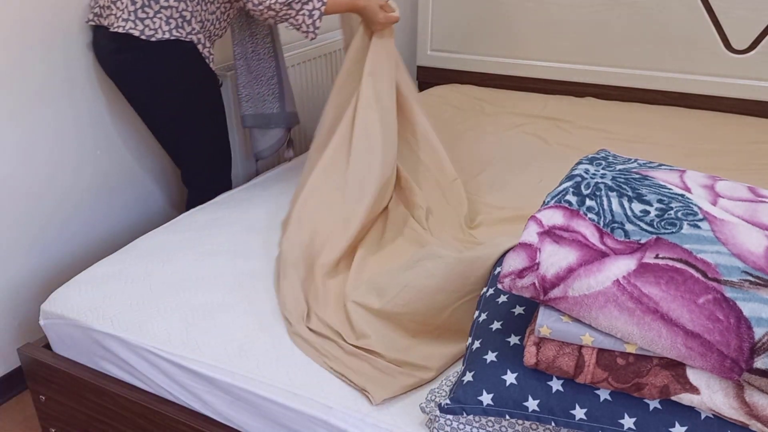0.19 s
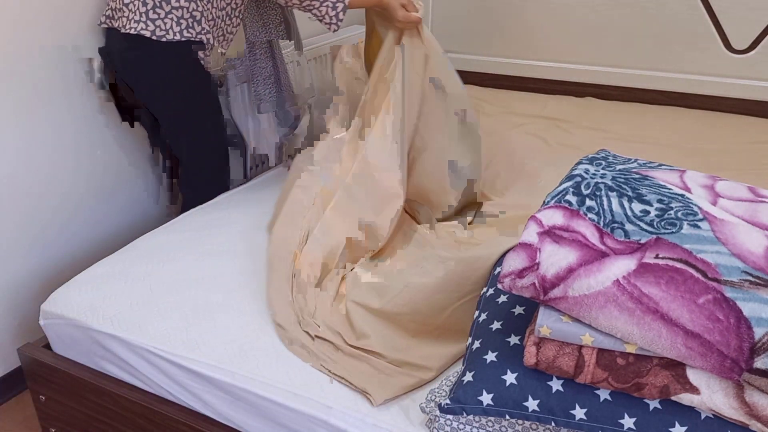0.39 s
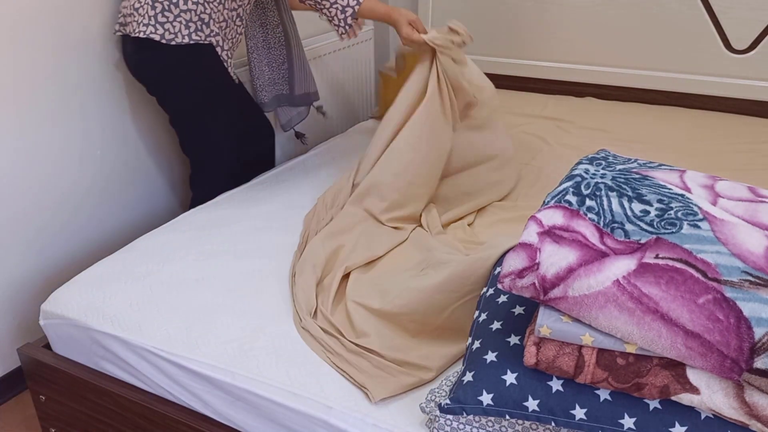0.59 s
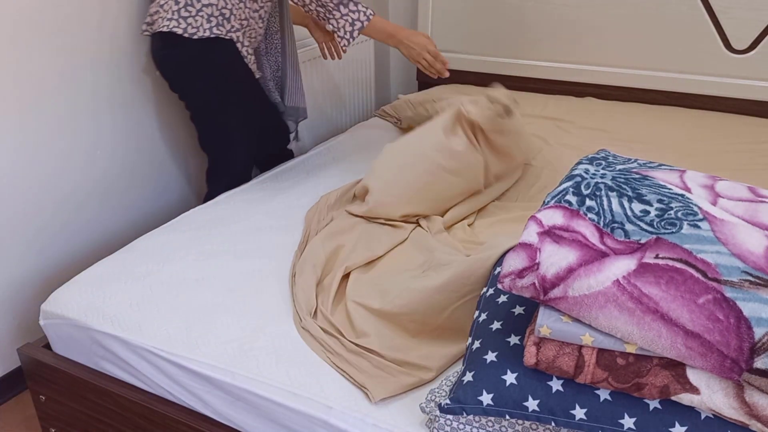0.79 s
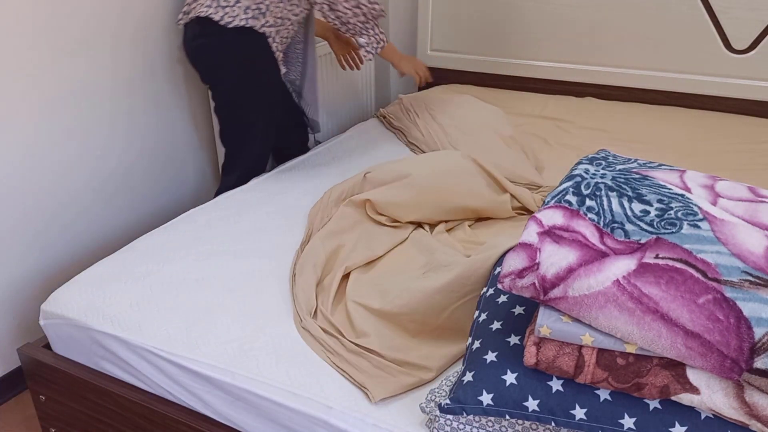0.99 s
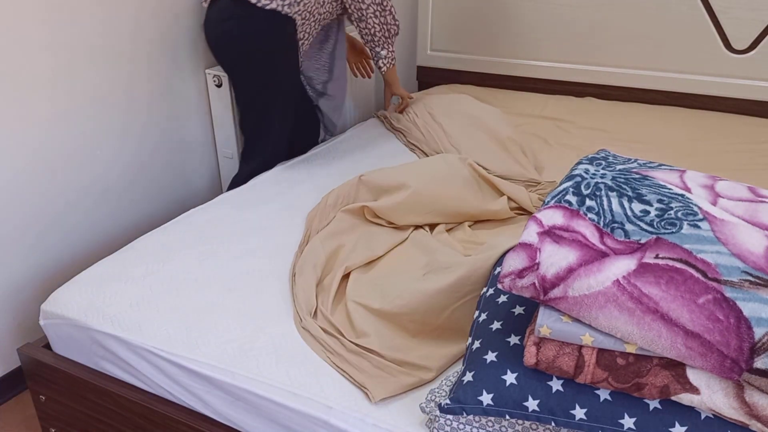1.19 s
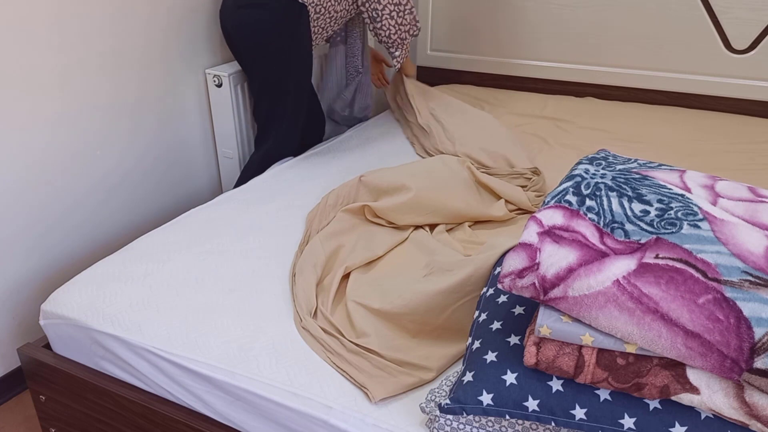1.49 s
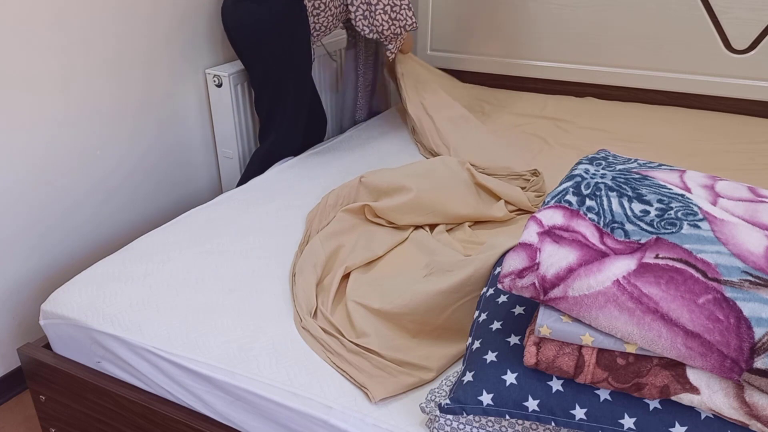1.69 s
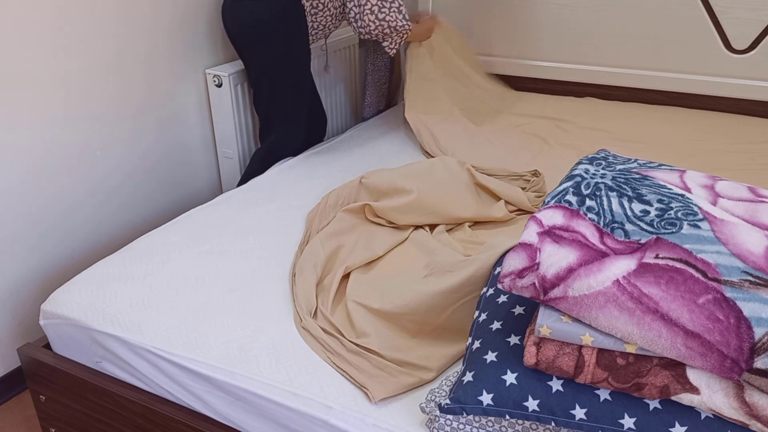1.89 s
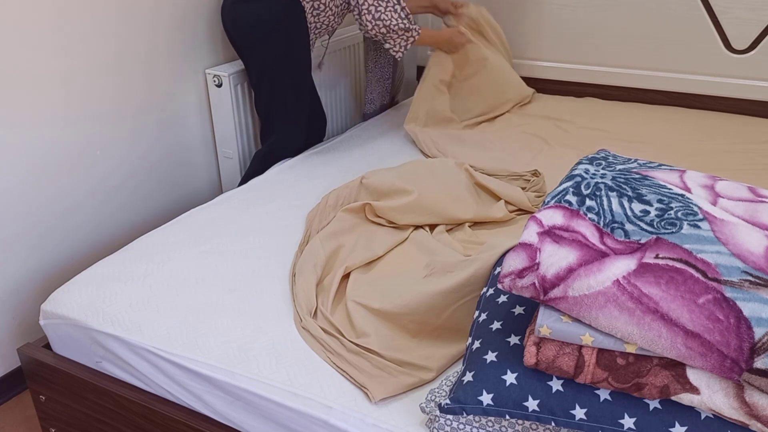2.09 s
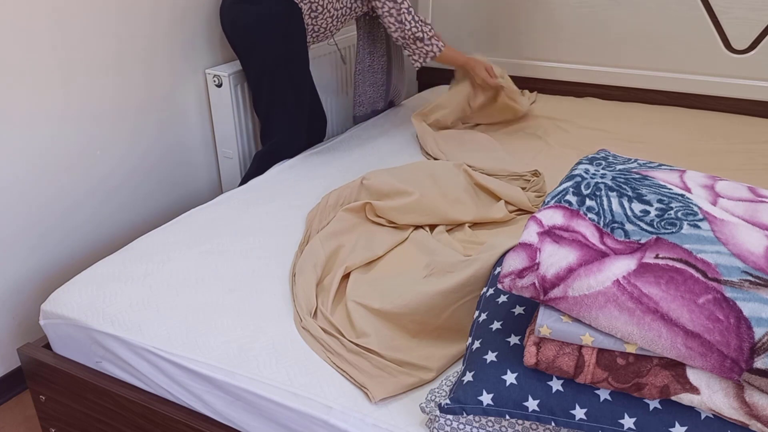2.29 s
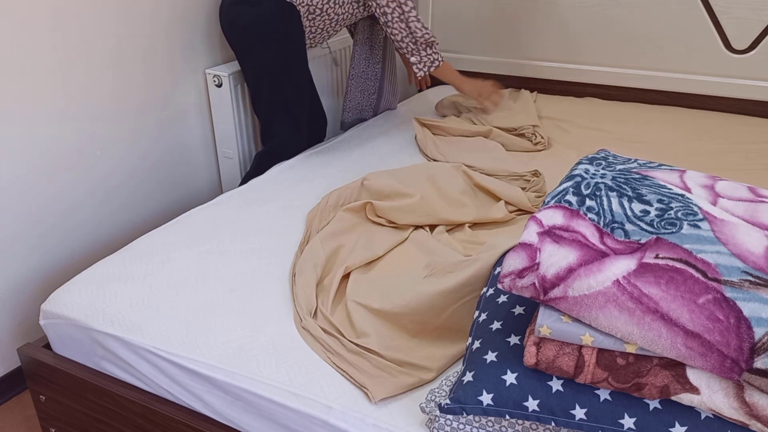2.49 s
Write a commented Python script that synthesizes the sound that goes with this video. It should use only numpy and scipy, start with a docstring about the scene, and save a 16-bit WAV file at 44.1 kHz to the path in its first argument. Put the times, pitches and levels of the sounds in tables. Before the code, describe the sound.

A cotton sheet rustles and swishes over a mattress, with two heavy thumps.

```python
"""A small, quiet bedroom, in stereo, the microphone near enough to the bed to overload.
A cotton sheet is shaken out over the mattress: cloth hisses as it slides on cloth, loose folds
flap, and the bundle slaps down once. Two heavy thumps and a few soft ones set the bed and the
room booming; on the loudest, the bass flattens in the microphone."""
import sys
import numpy as np
from scipy import signal
from scipy.io import wavfile

SR = 44100
rng = np.random.default_rng(int(sys.argv[2]) if len(sys.argv) > 2 else 0)


def store_pcm(level_fs):
    """Save levels as 16-bit WAV."""
    pcm = np.round(np.clip(level_fs, -1, 1) * 32767).astype(np.int16)
    wavfile.write(sys.argv[1], SR, np.atleast_2d(pcm).T)


N = 114660


def amp(db):
    return 10 ** (np.asarray(db) / 20)


def in_time(rows):
    """One curve for each column after time_s."""
    time_s, *columns = np.transpose(rows)
    return [np.interp(np.arange(N) / SR, time_s, column) for column in columns]


def at_hz(rows, hz):
    """Read the second column at a frequency, on a log axis."""
    rows = np.array(rows)
    return np.interp(np.log(hz), np.log(rows[:, 0]), rows[:, 1])


def drift(rate_hz):
    """A slow random wander of RMS 1."""
    hop, settle = 40, 2000
    pole = np.exp(-2 * np.pi * rate_hz * hop / SR)
    noise = rng.standard_normal(N // hop + settle + 2)
    slow = signal.lfilter([1], [1, -2 * pole, pole * pole], noise)[settle:]
    slow /= np.sqrt(np.mean(slow ** 2))
    return np.interp(np.arange(N) / hop, np.arange(len(slow)), slow)


def ring(x, hz, t60_s):
    """A damped mode: a unit click sets a sine of height 1 ringing."""
    decay, step = amp(-60 / (t60_s * SR)), 2 * np.pi * hz / SR
    return signal.lfilter([0, np.sin(step)], [1, -2 * decay * np.cos(step), decay ** 2], x)


def white():
    """Two mid/side pairs of white noise."""
    return rng.standard_normal((2, 2, N))


def banded(spectrum, noise, flicker_db, envelope=lambda hz: 1):
    """Stereo noise in flickering third octaves, of RMS 1 before each band's envelope."""
    # likeness of left and right at the microphone: freq_hz, correlation
    stereo_likeness = [(60, 0.79), (250, 0.96), (500, 0.48), (1000, -0.53), (2000, 0.1), (8000, 0)]
    bottom_hz, top_hz = spectrum[0][0], spectrum[-1][0]
    edges = bottom_hz * 2 ** np.arange(0, np.log2(top_hz / bottom_hz) + .5, 1 / 3)
    out, power, shared_drift = 0, 0, drift(rate_hz=2.7)
    for k, (low, high) in enumerate(zip(edges, np.minimum(edges[1:], .49 * SR))):
        bandpass = signal.butter(2, [low, high], "band", fs=SR, output="sos")
        mid, side = signal.sosfilt(bandpass, noise[k % 2])
        hz = np.sqrt(low * high)
        alike = np.clip(at_hz(stereo_likeness, hz), -1, 1)
        gain = amp(at_hz(spectrum, hz) + flicker_db * (0.13 * shared_drift + drift(rate_hz=24)))
        band = gain * (np.sqrt(1 + alike) * mid + np.sqrt(1 - alike) * side * [[1], [-1]])
        out = out + band * envelope(hz)
        power += np.mean(band ** 2)
    return out / np.sqrt(power)


def room_tone():
    """The steady hush of the bedroom."""
    # spectrum of the quiet room: freq_hz, density_db
    hush = [(25, -43), (50, -8), (75, -8.5), (130, -7.5), (300, -11), (500, -8.5), (1000, -8.5),
            (1500, -14), (2050, -16.5), (2500, -36.5), (3200, -38), (4500, -33), (6800, -30), (9000, -34),
            (12500, -32), (15500, -35)]
    return banded(hush, white(), flicker_db=0)


def wall_echoes(x, cut_hz, t60_s=0.23):
    """Sound bounces between close walls: six feedback delays a side, duller on every round."""
    out, dull = np.zeros((2, N)), np.exp(-2 * np.pi * cut_hz / SR)
    delays_s = np.geomspace(.013, .041, 12)
    for k, lag in enumerate((delays_s * SR).astype(int)):
        loop, state = x.copy(), [0.]
        gain = amp(-60 * lag / SR / t60_s)
        for i in range(lag, N, lag):
            echo, state = signal.lfilter([gain * (1 - dull)], [1, -dull], loop[i - lag:i], zi=state)
            loop[i:i + lag] += echo[:N - i]
        out[k % 2] += (loop - x) * (-1) ** (k // 2)
    return out


def thin_hiss():
    """A faint, narrow hiss high up that comes and goes."""
    # course of the hiss: time_s, level_db
    course = [(0, -70), (.45, -64), (.6, -55), (.8, -63), (1.0, -53), (2.05, -62), (2.2, -63), (2.4, -51.5),
              (2.5, -68), (2.6, -80)]
    # its spectrum: freq_hz, density_db
    spectrum = [(5000, -18), (6000, -1), (7000, 2), (8000, -8), (9000, -25)]
    return amp(in_time(course)[0]) * banded(spectrum, white(), flicker_db=1)


def fibre_slips(per_s=12000):
    """Dense tiny slips of thread over thread, uneven in size."""
    return white() * (rng.random((2, 2, N)) < per_s / SR) + 1e-9


def sliding_cloth():
    """Cloth rubs on cloth in a swish, with a bright sheen as the sheet is first whipped up."""
    # course of the sliding: time_s, swish_db, treble_offset_db
    slide = [(0, -28, -6), (.06, -28.5, -2), (.17, -28.5, 1), (.23, -26, -3.5), (.26, -30.5, -1.5),
             (.34, -32.5, -3.5), (.39, -40.5, -5), (.46, -53, 2), (.6, -52.5, -11), (1.0, -66, 18),
             (1.11, -42, -8), (1.2, -51.5, 1.5), (1.3, -52.5, -5), (1.36, -44, 2.5), (1.41, -35.5, -4.5),
             (1.44, -43, -6), (1.51, -42, 0.5), (1.56, -31.5, -4), (1.62, -32, -4), (1.72, -35, -3),
             (1.79, -35.5, -1), (1.86, -30, -2), (1.92, -30, -6), (1.97, -31, -9.5), (2.03, -39.5, -1.5),
             (2.09, -49.5, -4), (2.15, -55, -2), (2.2, -48.5, 3), (2.29, -53.5, 0), (2.35, -55.5, 2),
             (2.39, -49, -2), (2.5, -59, -7), (2.6, -80, -22)]
    # course of the sheen: time_s, level_db
    whip = [(0, -55), (.07, -31), (.14, -27), (.2, -33), (.3, -36), (.4, -94), (2.6, -84)]
    # spectra of the swish, its treble and its sheen: freq_hz, density_db
    swish_band = [(1500, 0), (2200, 0), (3200, -0.5), (4200, -2.5), (5500, -6), (7000, -9), (9000, -53.5),
                  (15000, -37)]
    treble_band = [(4000, -21), (7000, -5.5), (8500, -7), (10500, -6), (12500, -2), (15500, -9)]
    sheen_band = [(2200, 14), (3000, 7), (3800, 8), (4600, 3), (5200, -37)]
    swish_db, treble_offset_db = in_time(slide)
    swish = amp(swish_db) * banded(swish_band, fibre_slips(), flicker_db=0.95)
    treble = amp(swish_db + treble_offset_db) * banded(treble_band, fibre_slips(), flicker_db=-0.5)
    sheen = amp(in_time(whip)[0]) * banded(sheen_band, fibre_slips(), flicker_db=1.1)
    return swish + treble + sheen


def flapping_folds():
    """Loose folds flap: the dull part of the rustle."""
    # course of the flapping: time_s, level_db, mid_offset_db
    flap = [(0, -28.5, -4.5), (.06, -28, -3.5), (.17, -29, 0), (.22, -28, 1.5), (.3, -18, -7.5),
            (.4, -31.5, -3), (.5, -37.5, -9), (.72, -45.5, 1.5), (.8, -35, -15), (.86, -41.5, -2),
            (.9, -21.5, -1), (1.0, -30, 1), (1.1, -30, -17), (1.2, -29, -14), (1.3, -36.5, -8),
            (1.4, -33, -1.5), (1.47, -42, 3), (1.56, -36, 4), (1.7, -34.5, 3), (1.82, -40.5, 8.5),
            (1.88, -28.5, -2.5), (1.97, -25.5, -4), (2.03, -30.5, -4), (2.09, -28.5, -12),
            (2.15, -39.5, -13), (2.19, -37, 5), (2.25, -39.5, 2.5), (2.30, -44.5, 0), (2.42, -34, -3),
            (2.5, -41.5, 1), (2.6, -39, -5)]
    # spectra of the folds' lows and midrange: freq_hz, density_db
    low_band = [(70, 1), (120, -4), (200, -3), (330, -0.5), (500, -3), (700, -14), (1000, -9)]
    mid_band = [(450, -25), (700, 4), (1000, 4), (1400, -0.5), (2000, -2), (2500, -25), (3200, -57)]
    level_db, mid_offset_db = in_time(flap)
    lows = amp(level_db) * banded(low_band, white(), flicker_db=2)
    mids = amp(level_db + mid_offset_db) * banded(mid_band, white(), flicker_db=1.7)
    return lows + mids


def sheet_slap():
    """Bundled cloth slaps down: a puff that starts at once, swells briefly and dies band by band."""
    # the landing: start_s, level_db, rise_s, tilt_db_per_octave
    landings = [(0.8677, -20, 0.031, 0.5)]
    # spectrum and decay of the puff: freq_hz, density_db, t60_s
    puff = [(387, 8, 0.4), (674, -1, 0.1), (1190, -7, 0.31), (2040, -7.5, 0.5), (3500, -12, 0.61),
            (5940, -18, 0.56), (8900, -24, 0.37), (15500, -35, 0.38)]

    def envelope(hz, fast_above_hz=5300):
        t60_s = at_hz(np.array(puff)[:, [0, 2]], hz)
        octaves = np.log2(hz / puff[0][0])
        out = 0
        for start_s, level_db, rise_s, tilt in landings:
            band_rise_s = rise_s / (1 + (hz / fast_above_hz) ** 2)
            age_s = np.maximum(np.arange(N) / SR - start_s, 0)
            swell = (age_s > 0) * (0.67 + 0.69 * np.minimum(age_s / band_rise_s, 1))
            decay_db = 60 * np.maximum(age_s - band_rise_s, 0) / t60_s
            out = out + swell * amp(level_db + tilt * octaves - decay_db)
        return out
    return banded(puff, white(), flicker_db=0.3, envelope=envelope)


def mattress_thumps(swell_cycles=2.3, bass_cut_hz=23):
    """Each push swells into the modes of bed and room, most into those near its own pitch."""
    # pushes on the mattress: start_s, level_db, pitch_hz, width_octaves
    pushes = [(0.049, -29.5, 180, 0.22), (0.2366, 1.5, 144, 0.65), (.24, -11, 64, 0.2),
              (.243, 7.5, 112.6, 0.29), (.266, 4.5, 201.6, 0.094), (.29, -3, 193, 0.22),
              (.297, -21, 540, 0.18), (0.298, -6.5, 105, 0.42), (.31, -3, 60.3, 0.28),
              (.318, -8.5, 334, 0.12), (.35, -8.5, 160.3, 0.44), (0.869, -14.5, 227, 0.34),
              (.873, 0, 136, 0.17), (.885, -15, 420, .3), (.891, -3.5, 168.5, 0.17),
              (0.899, -3.5, 76, 0.48), (.915, -9.5, 345, 0.35), (0.926, -8, 232, 0.23),
              (.965, -11.5, 139, 0.51), (1.009, -17.5, 228, 0.31), (1.091, -33.5, 516, 0.33),
              (1.609, -43.5, 153, 0.48), (1.861, -20.5, 140, 0.18), (1.884, -24, 149, 0.36),
              (1.915, -33, 420, 0.49), (1.936, -16, 135, 0.2), (1.954, -26.5, 199.4, 0.49),
              (1.99, -24, 101, 0.25), (2.029, -35, 353, 0.37), (2.049, -21.5, 103, 0.18),
              (2.386, -31, 128, 0.23), (2.421, -39, 204, 0.54), (2.481, -32, 497, 0.2)]
    # modes of bed and room: pitch_hz, gain_db, t60_s
    modes = [(56, -40, 1), (73.15, -2, 0.32), (106.6, -2.5, 0.36), (135.9, -3.5, 0.27), (162.1, 2, 0.21),
             (194.6, 5.5, 0.28), (238.4, 1, 0.32), (290, 2, 0.38), (337.4, -0.5, 0.3), (398, -14.5, .3),
             (456, -3, 0.53), (513, -10, 0.89), (629, 7, 0.25)]
    start_s, level_db, pitch_hz, width_octaves = np.transpose(pushes)
    scatter_db = rng.standard_normal((len(pushes), len(modes)))
    boom = np.zeros(N)
    for k, (hz, gain_db, t60_s) in enumerate(modes):
        off_pitch_db = -6 * (np.log2(hz / pitch_hz) / width_octaves) ** 2
        clicks = np.full(N, 1e-18)
        clicks[(start_s * SR).astype(int)] = amp(level_db + gain_db + off_pitch_db + scatter_db[:, k])
        swell_s = swell_cycles / hz
        # a short burst, scaled to build the mode up to about the click's height
        drive = ring(clicks, hz, swell_s) * 2 * np.log(1000) / (swell_s * SR)
        boom += (-1) ** k * ring(drive, hz, t60_s)
    return signal.sosfilt(signal.butter(2, bass_cut_hz, "high", fs=SR, output="sos"), boom)


def scene():
    """Thumps and rustle, a touch left of centre, with their echoes over the room tone."""
    boom = mattress_thumps()
    rustle = sliding_cloth() + thin_hiss() + flapping_folds() + sheet_slap()
    hush = amp(-38.5) * room_tone()
    boom_echoes = amp(-19.5) * wall_echoes(boom, cut_hz=2350)
    rustle_echoes = amp(-12.5) * wall_echoes(rustle.mean(axis=0), cut_hz=4300)
    leftward = np.array([[1], [-1]])
    return (boom * amp(1.04 * leftward) + boom_echoes
            + (rustle + rustle_echoes + hush) * amp(0.65 * leftward))


def record(dry):
    """The microphone overloads: bass flattens while treble rides on; peaks clip and the top is cut."""
    overload_below_hz, ceiling, knee, top_hz = 950, 0.86, 10, 15600
    bass = signal.sosfiltfilt(signal.butter(1, overload_below_hz, fs=SR, output="sos"), dry)
    flat_bass = bass / (1 + np.abs(bass / ceiling) ** knee) ** (1 / knee)
    clipped = np.clip(flat_bass + dry - bass, -.97, .97)
    return signal.sosfilt(signal.ellip(12, .2, 55, top_hz, fs=SR, output="sos"), clipped)


dry = scene()
out = record(dry)
store_pcm(out)
```